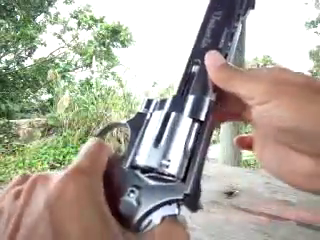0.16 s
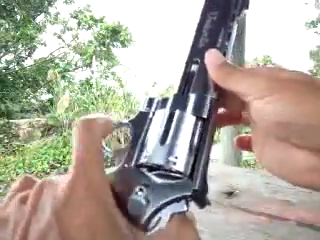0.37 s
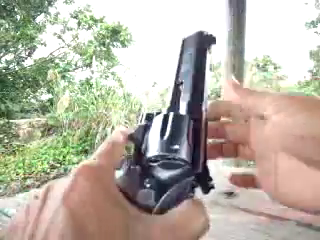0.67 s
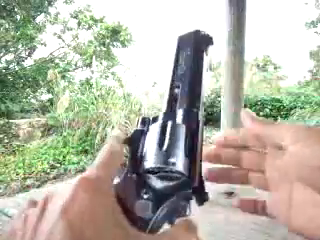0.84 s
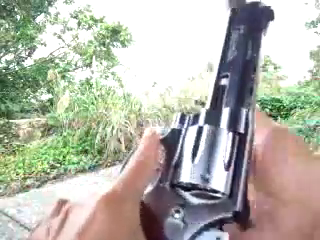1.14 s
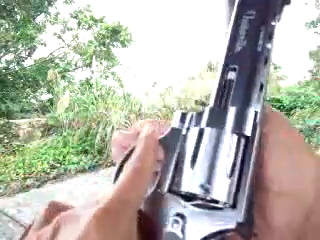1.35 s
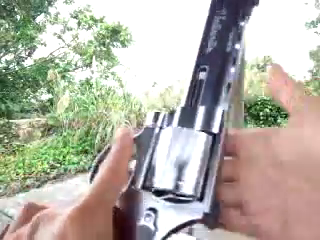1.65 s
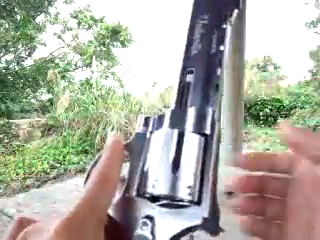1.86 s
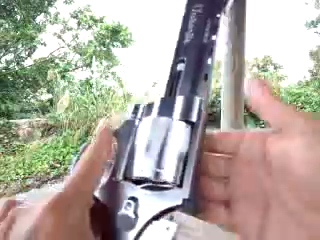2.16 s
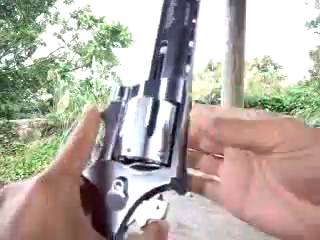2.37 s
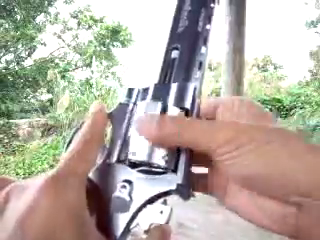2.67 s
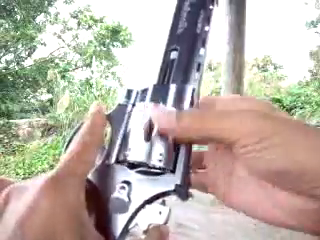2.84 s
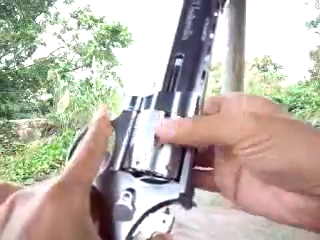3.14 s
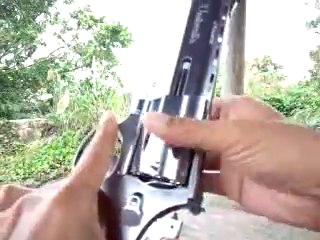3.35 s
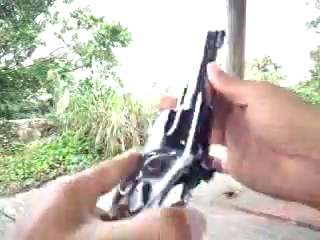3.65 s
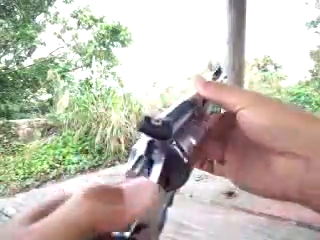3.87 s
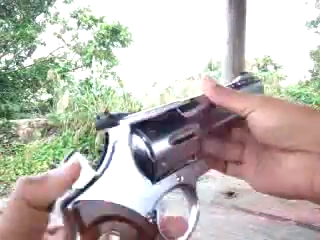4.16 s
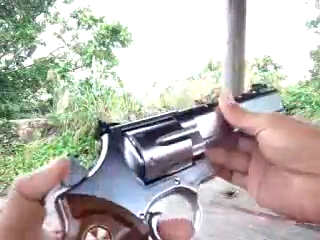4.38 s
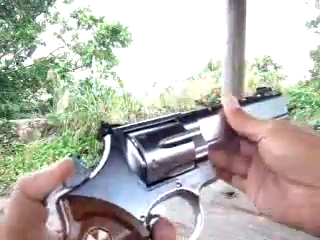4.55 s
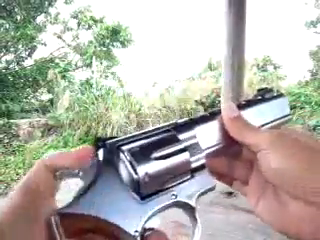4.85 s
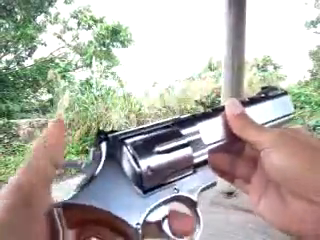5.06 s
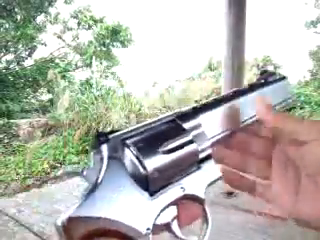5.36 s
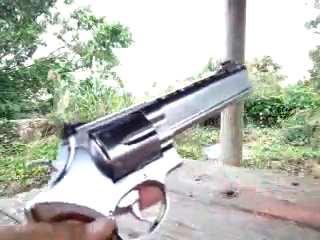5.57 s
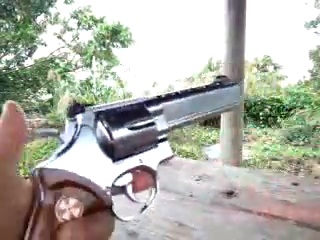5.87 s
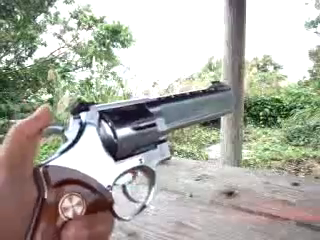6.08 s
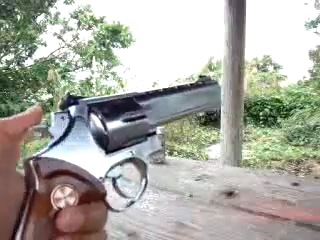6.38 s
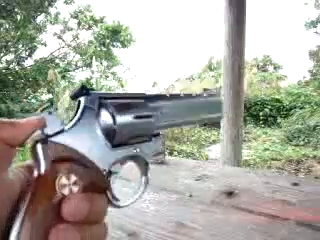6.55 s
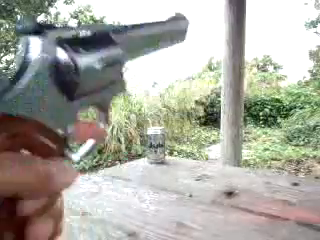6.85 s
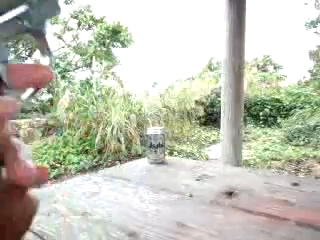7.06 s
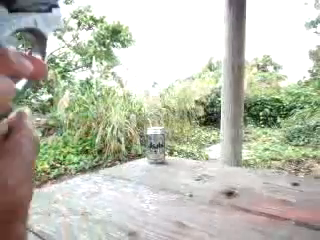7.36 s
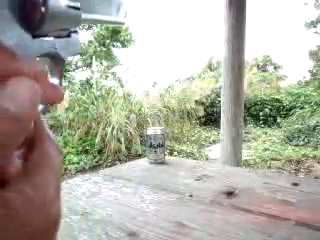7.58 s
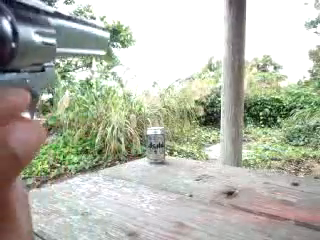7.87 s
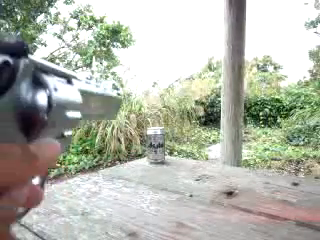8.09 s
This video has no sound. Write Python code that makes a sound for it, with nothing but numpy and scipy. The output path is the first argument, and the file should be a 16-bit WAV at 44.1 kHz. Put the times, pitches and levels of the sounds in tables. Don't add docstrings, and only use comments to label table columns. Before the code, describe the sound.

Very close, bright and slightly overloaded metal clicks with a short ringing body: paired snaps, a rapid ratchet of six notches, another of four, lone clicks, then clustered hammer and latch catches. Dry little skin squeaks fall between. The open air holds leaf hiss, low rumble and a receding motor hum, pushed down by gain control and recovering. Low-quality compressed sound smears the clicks; the end is mostly breeze.

```python
import sys
import numpy as np
from scipy import signal
from scipy.fft import rfft, irfft
from scipy.io import wavfile
from scipy.ndimage import uniform_filter1d

SR = 44100
rng = np.random.default_rng(int(sys.argv[2]) if len(sys.argv) > 2 else 0)


def voltage_ratio(level):
    return 10 ** (np.asarray(level, float) / 20)


def wrap_up_sound(samples):
    columns = np.atleast_2d(samples).T
    tamed = np.clip(columns, -1, 1)
    steps = np.round(tamed * 32767).astype(np.int16)
    wavfile.write(sys.argv[1], SR, steps)


N = 362502
LOW_SR, BLOCK = 16000, 1024
# (time [s], level [dB])
MOTOR = [
    (0, 6),
    (1, -4.5),
    (1.6, 0),
    (2.1, -10.5),
    (2.6, -6.5),
    (3.8, -3.6),
    (5.5, -2.5),
    (6.95, -10),
    (8.22, -11.5),
]


def evened(x):
    return x / np.sqrt(np.mean(x ** 2) + 1e-20)


def read(points, hz):
    f, value = np.transpose(points)
    return np.interp(np.log(hz + 1), np.log(f + 1), value)


def add(mix, s, sound):
    part = mix[round(s * SR):][:len(sound)]
    part += sound[:len(part)]


def resonate(x, hz, width):
    turn = np.exp(2j * np.pi * np.cumsum(hz * np.ones(len(x))) / SR)
    r = np.exp(-np.pi * width / SR)
    return 2 * (turn * signal.lfilter([1 - r], [1, -r], x / turn)).real


def ring(x, modes):
    y = np.zeros(len(x))
    for k, (hz, width, db) in enumerate(modes):
        y += (-1) ** k * voltage_ratio(db) * resonate(x, hz, width)
    y = signal.sosfilt(signal.butter(2, 600, "high", fs=SR, output="sos"), y)
    return y / abs(y).max()


def leaves_and_rumble():
    # (frequency [Hz], density [dB per Hz])
    air = [(12, -51), (20, -9.5), (81, -22.5), (112, -43.5), (181, -11), (291, -0.5), (329, -8.5),
           (383, -5), (517, -12.5), (586, -11), (1720, -20), (4020, -22), (5710, -14.5), (7150, -23),
           (7900, -25), (10300, -86.5), (17400, -120)]
    # (time [s], level [dB])
    breeze = [(0, -3), (.5, -0.5), (1.3, -1), (3.2, -2.5), (3.9, 1.5), (4.95, -1), (5.5, 1), (6.05, 9),
              (6.45, -1.5), (6.95, 8), (7.4, 6.5), (8.22, 0.5)]
    frames, hz = N // 256 + 5, np.fft.rfftfreq(1024, 1 / SR)
    t = np.arange(frames) * 256 / SR
    a, b, patches = rng.standard_normal((frames, 513, 3)).T
    patches = evened(uniform_filter1d(uniform_filter1d(patches, 10, 0), 12, 1))
    high = np.clip(np.log2((hz + 1) / 700) / 2.9, 0, 1)[:, None]
    scale = evened(voltage_ratio(read(air, hz)))[:, None] * voltage_ratio(-34.5)
    rumble_db = 1.7 + 0.19 * np.interp(t, *np.transpose(MOTOR))
    drift_db = (1 - high) * rumble_db + high * np.interp(t, *np.transpose(breeze))
    spectrum = (a + 1j * b) * scale * voltage_ratio(drift_db + 1.2 * patches)
    return signal.istft(spectrum, nperseg=1024, noverlap=768)[1][:N] / 30


def far_motor():
    # (frequency [Hz], rms level [dB])
    lines = [(193.8, -45.5), (290.7, -46.5), (484.5, -47), (581.4, -54.5)]
    hum = np.zeros(N)
    for hz, db in lines:
        hum += voltage_ratio(db) * evened(resonate(rng.standard_normal(N), hz, 2.7))
    return hum * voltage_ratio(np.interp(np.arange(N) / SR, *np.transpose(MOTOR)))


def ducking(x):
    power_db = 10 * np.log10(abs(uniform_filter1d(x ** 2, 3000, origin=1499)) + 1e-12)
    climb = np.arange(N) * 34.6 / SR
    held_db = np.maximum.accumulate(power_db + climb) - climb
    over_db = np.maximum(held_db + 28.5, 0)
    return voltage_ratio(-1.2 * uniform_filter1d(over_db, 600, origin=299))


def shelter(x, t60=0.19):
    t = np.arange(6000) / SR
    tail = rng.standard_normal(6000) * voltage_ratio(-60 * t / t60) * np.clip(t / 0.0035 - 1, 0, 1)
    return signal.oaconvolve(x, tail / np.linalg.norm(tail))[:N]


def slide(length, press, peak_db, fade_db):
    t = np.arange(0, length, 1 / SR)
    unevenness = evened(uniform_filter1d(rng.standard_normal(len(t)), size=110))
    slips = rng.standard_normal(len(t)) * voltage_ratio(1.8 * unevenness)
    grip_db = -18 * np.maximum(1 - t / press, 0) - fade_db * np.maximum(t - press, 0)
    hz = 5010 - 25 * grip_db
    band = 1.1 * evened(resonate(resonate(slips, hz - 100, 1700), hz - 100, 1700))
    band = band * voltage_ratio(-93 * t)
    squeak = evened(resonate(slips, hz + 420, 380))
    clack = 0.15 * evened(ring(slips, [(3090, 1900, 0)]))
    lift = np.clip((length - t) / (0.21 * length), 0, 1)
    return voltage_ratio(peak_db + grip_db) * evened(band + squeak + clack) * lift


def finger_strokes(gun):
    # (start [s], press [s], length [s], peak [dB], fade [dB per s])
    strokes = [
        (1.631, 0.021, 0.08, -23, 109),
        (3.388, 0.0077, 0.064, -23.5, 67),
        (3.875, 0.027, 0.1, -23, 181),
        (4.823, 0.018, .11, -21.5, 151),
        (5.535, 0.0061, 0.11, -23.5, 113),
        (6.535, .03, 0.068, -21.5, 14),
        (2.399, 0.02, .1, -39, 41),
        (2.62, 0.036, 0.11, -41, 35),
        (6.891, 0.035, .12, -33, 40),
        (7.269, 0.0079, 0.15, -24.5, 95),
    ]
    for start, press, length, peak_db, fade_db in strokes:
        add(gun, start, slide(length, press, peak_db, fade_db))


def blow(hz, clack_db, lasts_ms):
    # (frequency [Hz], width [Hz], level [dB])
    frame = [(956, 550, -12), (1886, 710, -5.5), (2677, 450, 2.5), (3495, 830, -3)]
    # (frequency [Hz], width [Hz], level [dB])
    cylinder = [(3816, 640, -6.5), (5030, 920, -13), (5750, 270, 1), (6720, 460, -6.5), (7624, 1000, -9.5)]
    ms = np.arange(700) * 1000 / SR
    shape = np.exp(-(ms / (1.6 * lasts_ms)) ** 2) + .3 * np.exp(-ms / (2.2 * lasts_ms))
    chatter = rng.choice([-1., 1.], 700) * np.minimum(ms / .7, 1) * shape
    chatter[20] += .85 * np.linalg.norm(chatter)
    spot = []
    for f, width, db in frame + cylinder:
        spot.append((f * rng.uniform(.95, 1.05), width, db + 2 * rng.standard_normal()))
    near = [(f, width, db - 6.5 * abs(np.log2(f / hz))) for f, width, db in spot[len(frame):]]
    hit = evened(ring(chatter, near + [(hz, 480, 2.0)]))
    hit = hit + voltage_ratio(clack_db) * evened(ring(chatter, spot[:len(frame)]))
    return np.tanh(1.3 * hit / abs(hit).max()) / np.tanh(1.3)


def loose_parts(gun):
    # (time [s], peak [dB], main ring [Hz], frame clack [dB])
    ticks = [(0.006, -18.5, 5680, -5), (0.1246, -23.5, 5670, -15), (0.188, -26.5, 2620, -8),
             (0.3037, -21.5, 6450, 1), (1.6727, -26, 5230, -9), (1.7076, -15, 6620, -25),
             (1.716, -16.0, 4940, -10), (1.7185, -12, 6480.0, -21), (2.1176, -28, 5900, -9.0),
             (2.1722, -27.0, 5450.0, -8), (2.2343, -18, 5660, -30), (2.2335, -12.5, 6040, -13),
             (2.6474, -25, 5800, -14.5), (3.871, -32.5, 5740, -13), (4.0306, -14, 4770, -5),
             (4.6202, -25.5, 2900, 1), (4.9849, -26, 3400, -4), (5.1074, -7.5, 5900, -8),
             (5.137, -8.5, 6470, -13.5), (5.346, -43, 5240.0, -11.0), (6.4877, -30, 5750, -1),
             (6.535, -19.5, 2560, -10), (6.666, -14.5, 5280, -12.5), (7.034, -19.5, 1820, -1.5),
             (6.6194, -21, 3840, -11.5)]
    for s, db, hz, clack_db in ticks:
        add(gun, s, voltage_ratio(db - 1.5) * blow(hz, clack_db, .5))


def snap(db, hz, clack_db, chatter_ms, rebound_db):
    sound = np.r_[blow(hz, clack_db, chatter_ms), np.zeros(700)]
    add(sound, .0122, voltage_ratio(rebound_db - 2) * blow(hz, clack_db, 1.5))
    return voltage_ratio(db - 1.5 - .4 * (db < 0)) * sound


def latch_and_hammer(gun):
    # (time [s], peak [dB], main ring [Hz], frame clack [dB], chatter [ms])
    catches = [(0.3338, -0.2, 6320, -9, 0.45), (0.3341, -4.5, 6270, -10, 0.36),
               (0.3395, -9, 6250, -10, 1.2), (0.3725, -4, 6030, -23, 1), (0.3768, -0.8, 5900, -5.5, 0.6),
               (0.3808, -11.5, 6020, -1.5, 0.39), (4.0521, -4.2, 5050, -5, 0.9),
               (4.06, -0.5, 5890, -5.5, 1.2), (4.6618, -3.7, 5610, -5.5, 2.1),
               (5.1179, -0.16, 5580, -15.5, 1.4), (5.1203, -5.5, 6830, -11.5, 1.0),
               (5.1231, -9, 5860, -18.5, 0.46), (5.128, -6, 5130, -4, 1.6), (5.1314, -1, 5020, -10, 2.2),
               (6.5897, -2, 5710, -12.5, 1.0), (6.6409, -3, 4600, -10.5, 0.85),
               (6.6524, -1.5, 4070, -6.5, 0.6)]
    for s, db, hz, clack_db, chatter_ms in catches:
        add(gun, s, snap(db, hz, clack_db, chatter_ms, rebound_db=-18))


def cylinder_ratchet(gun):
    # (time [s], peak [dB], main ring [Hz], frame clack [dB])
    notches = [(1.727, 1.0, 6300, -8), (1.7635, -1.5, 5980, -14), (1.7914, -0.7, 6010, -14),
               (1.8155, -2.1, 6630, -15), (1.8403, -1.6, 6400, -14), (1.8772, -2.2, 6570, -14),
               (2.2446, -1.2, 6100, -8), (2.2915, -1.0, 6290, -13), (2.3254, -0.8, 6490, -15),
               (2.3613, -2.4, 6080, -16), (2.7691, 1.4, 6470, -9), (3.0608, 1.0, 6480, -13),
               (3.4438, 1.0, 6490, -13), (3.9686, -1.5, 6330, -16)]
    for s, db, hz, clack_db in notches:
        add(gun, s, snap(db, hz, clack_db, chatter_ms=0.96, rebound_db=-15))


def scene():
    gun = np.zeros(N)
    cylinder_ratchet(gun)
    latch_and_hammer(gun)
    loose_parts(gun)
    finger_strokes(gun)
    outdoors = leaves_and_rumble() + far_motor()
    return (gun + voltage_ratio(-16.5) * shelter(gun) + outdoors * ducking(gun))[None]


def camera_blocks(x):
    # (frequency [Hz], level [dB])
    band_floor = [(20, -10), (110, -10), (170, -30), (500, -32), (800, -23), (1500, -21), (2400, -32),
                  (8000, -36)]
    block_start = 120
    n, k = np.arange(2 * BLOCK), np.arange(BLOCK)
    window = np.sin(np.pi * (n + .5) / (2 * BLOCK))[:, None]
    basis = window * np.cos(np.pi / BLOCK * np.outer(n + .5 + BLOCK / 2, k + .5))
    x = np.r_[np.zeros(2 * BLOCK - block_start), x, np.zeros(3 * BLOCK)]
    halves = x[:len(x) // BLOCK * BLOCK].reshape(-1, BLOCK)
    lines = np.hstack([halves[:-1], halves[1:]]) @ basis
    edges = np.r_[0:40:4, 40:96:8, 96:240:16, 240:BLOCK:32]
    widths, hz = np.diff(np.r_[edges, BLOCK]), edges * LOW_SR / 2 / BLOCK
    level = np.sqrt(np.add.reduceat(lines ** 2, edges, axis=1) / widths) + 1e-9
    treble = np.sqrt((level[:, (hz > 5000) & (hz < 7000)] ** 2).mean(axis=1, keepdims=True))
    luck = voltage_ratio(5.0 * rng.standard_normal(level.shape))
    kept = level * luck > treble * voltage_ratio(read(band_floor, hz))
    kept &= (hz < 7400) | (level[:, -3:-2] > voltage_ratio(0.0))
    usual = np.median(level[:, hz > 2000], axis=1, keepdims=True)
    even = level ** .45 * usual ** (1 - .45)
    step = np.repeat(np.minimum(even * voltage_ratio(0.83), 1.5 * level), widths, axis=1)
    rounded = np.round(lines / step) * step * np.repeat(kept, widths, axis=1)
    blocks = rounded @ basis.T * 2 / BLOCK
    return (blocks[1:, :BLOCK] + blocks[:-1, BLOCK:]).ravel()[BLOCK - block_start:]


def leaky_step_up(low):
    # (frequency [Hz], level [dB])
    edge = [(20, 2), (6800, 2.5), (7200, -3.5), (7600, -8.5), (8000, 3), (8500, -22.5), (9000, -40),
            (9400, -71), (22000, -99)]
    size = (len(low) // 160 + 1) * 160
    z = rfft(low, size)
    z = np.r_[z, z[-2::-1].conj(), np.zeros(size)][:size * SR // LOW_SR // 2 + 1]
    z = z * voltage_ratio(read(edge, np.arange(len(z)) * LOW_SR / size))
    return irfft(z, size * SR // LOW_SR)[:N] * SR / LOW_SR


def band_limit(x):
    return signal.sosfilt(signal.butter(12, 9300, fs=SR, output="sos"), x)


def record(dry):
    low = camera_blocks(signal.resample_poly(dry[0], 160, 441))
    mix = np.clip(leaky_step_up(low), -1, 1)
    return band_limit(mix[None])


dry = scene()
out = record(dry)
wrap_up_sound(out)
```